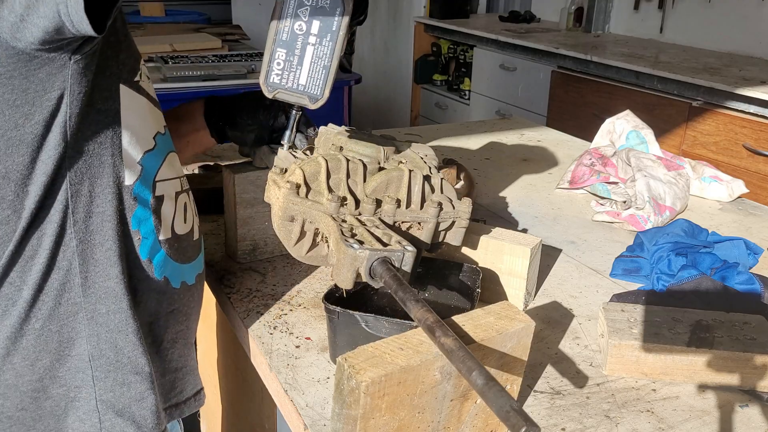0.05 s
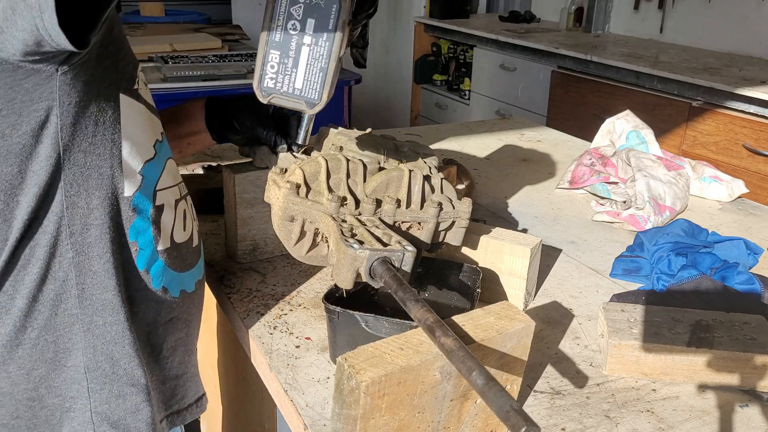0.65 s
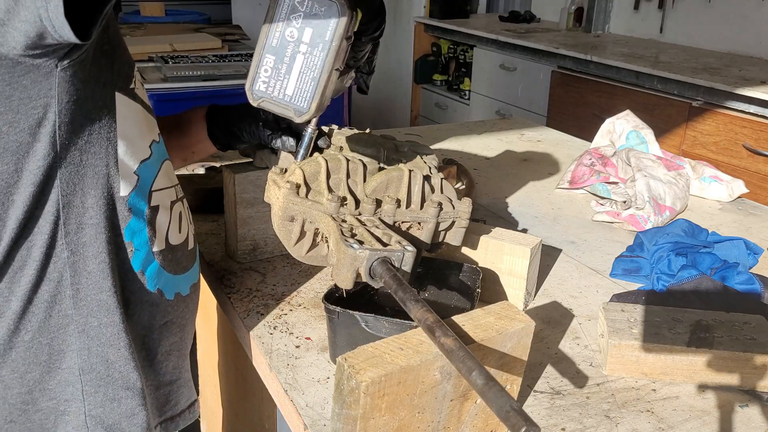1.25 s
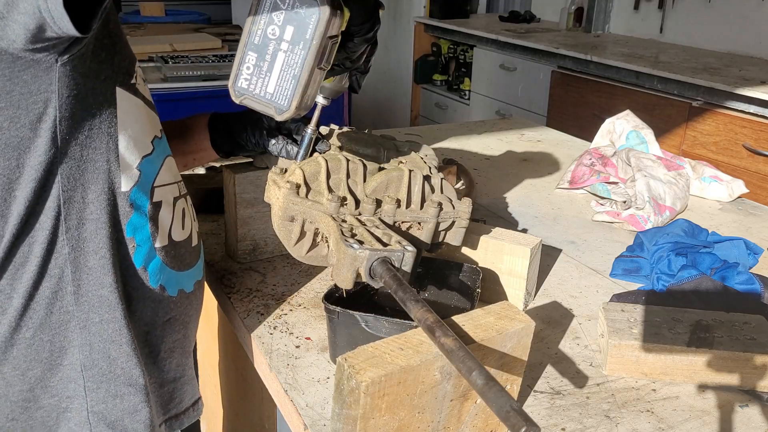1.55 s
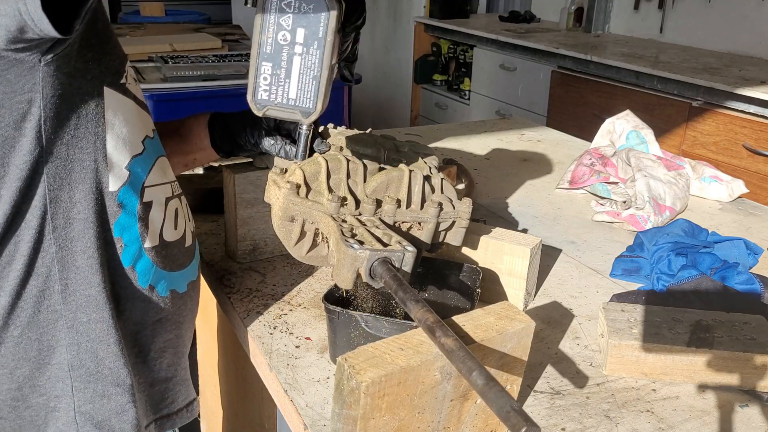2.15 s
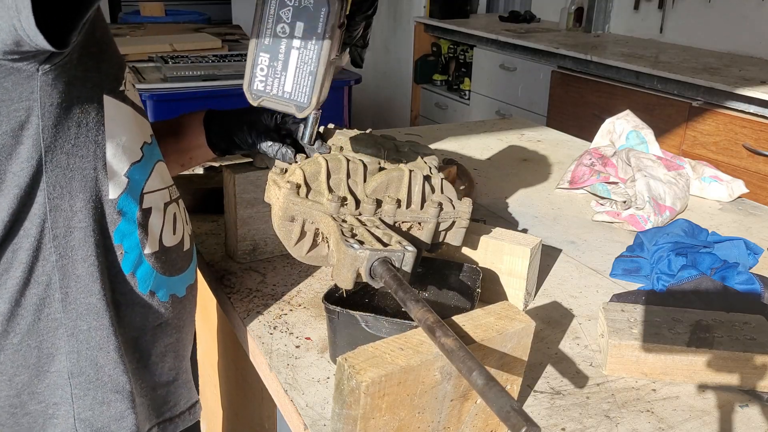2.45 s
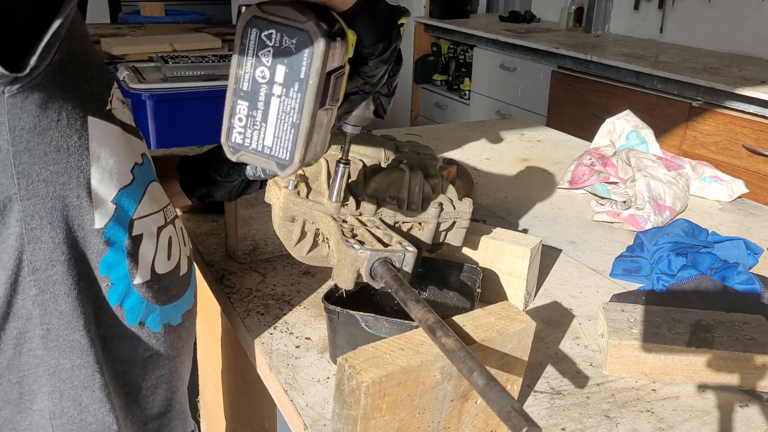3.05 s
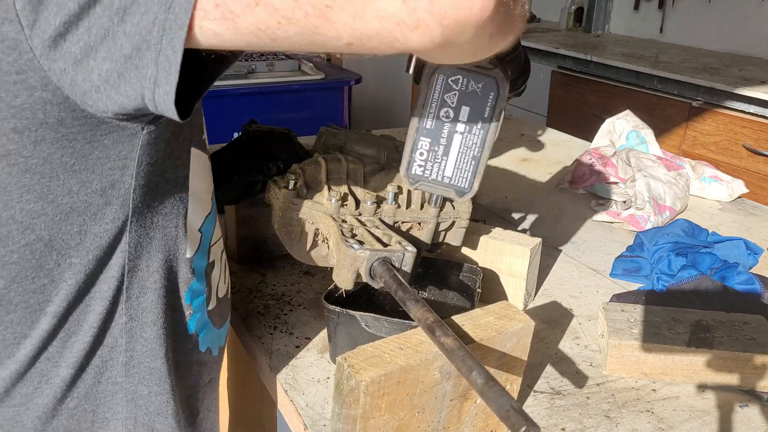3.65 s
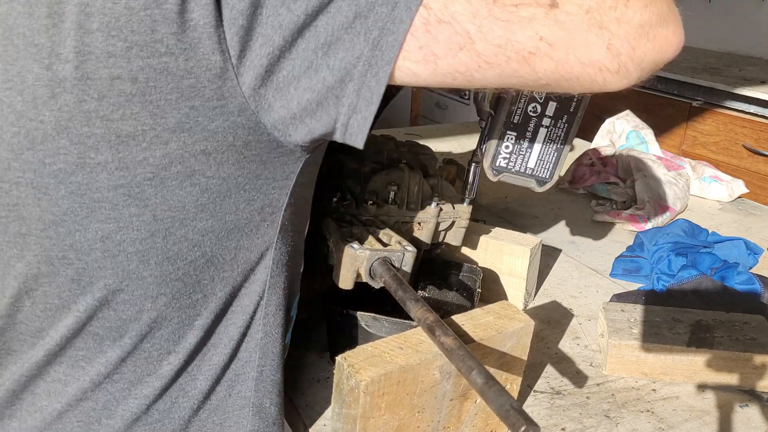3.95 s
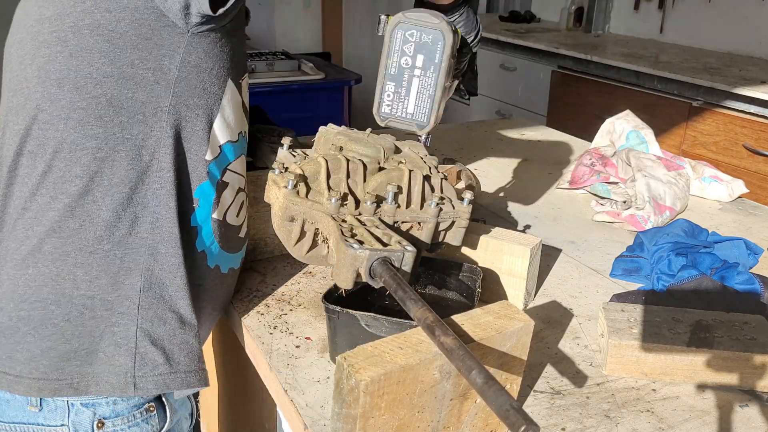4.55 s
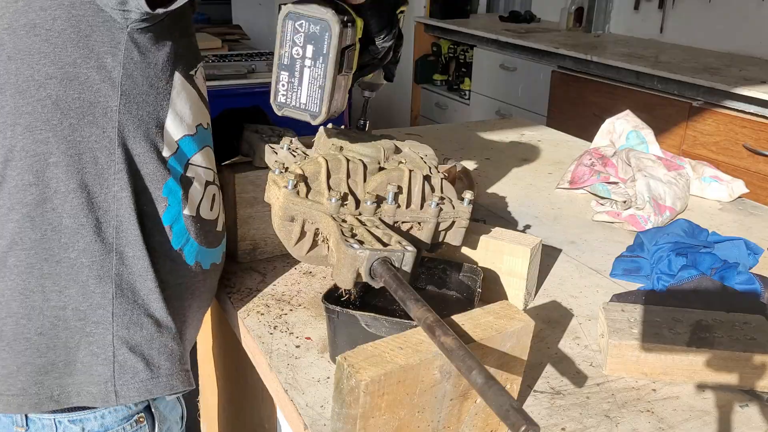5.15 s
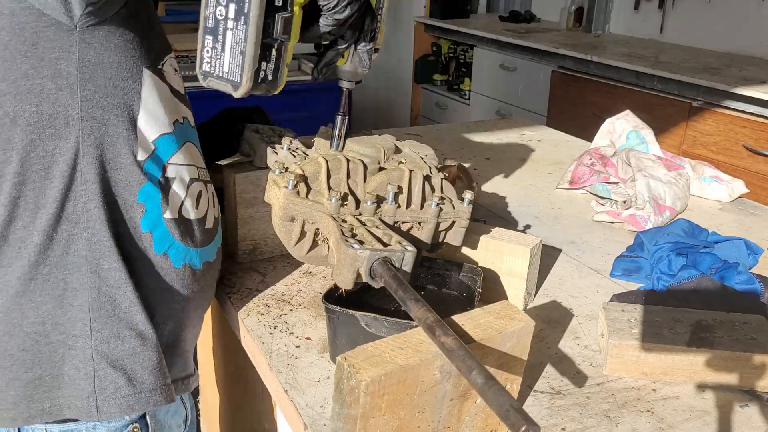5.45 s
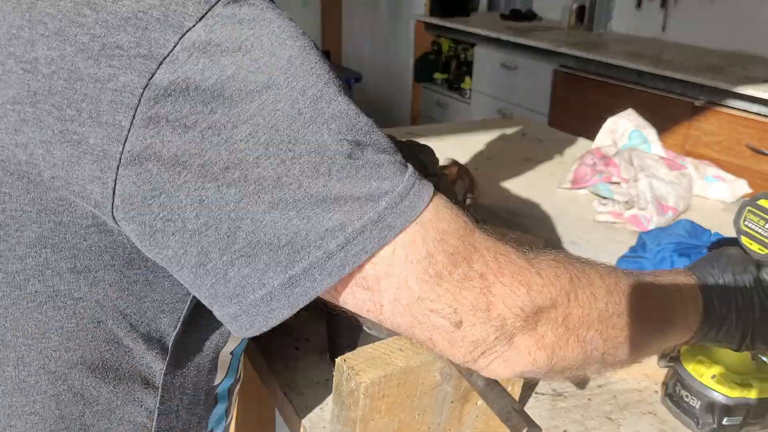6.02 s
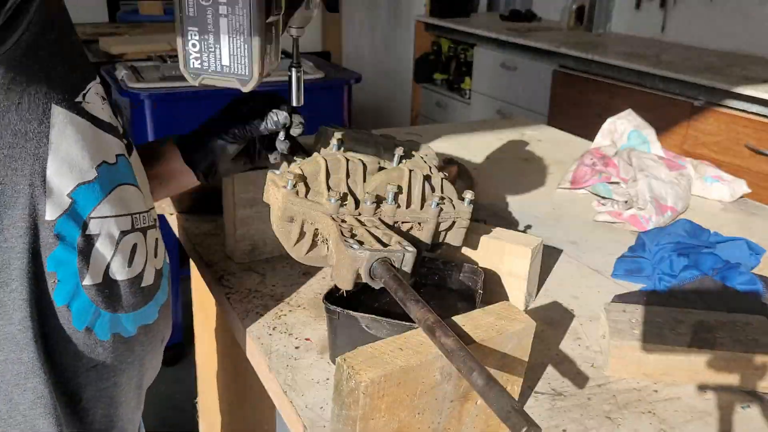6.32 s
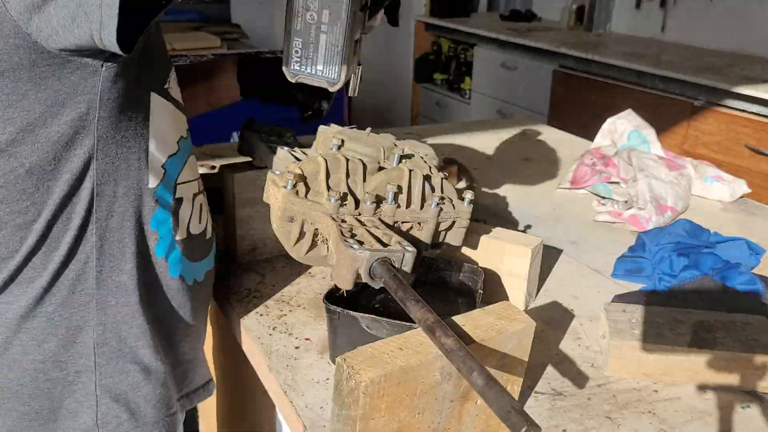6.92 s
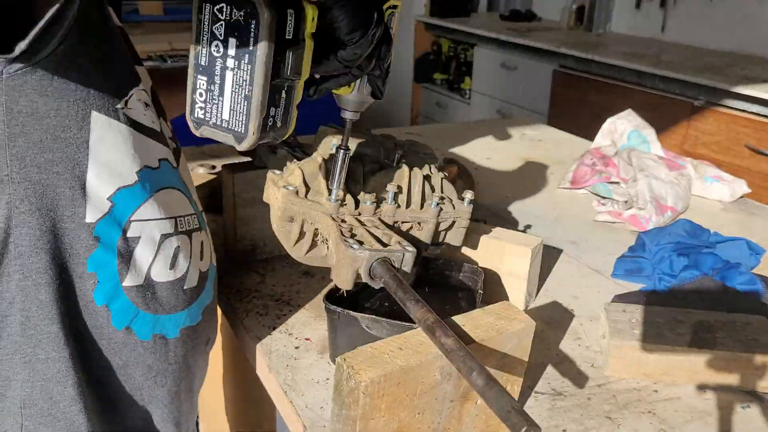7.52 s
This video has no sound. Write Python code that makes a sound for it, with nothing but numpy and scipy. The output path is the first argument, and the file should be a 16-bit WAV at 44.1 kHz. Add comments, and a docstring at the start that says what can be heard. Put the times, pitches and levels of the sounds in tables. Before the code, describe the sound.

A steel socket knocks sharply on a metal casing right at the start, close to the microphone in a quiet workshop. From about 0.8 seconds it taps and scrapes softly onto a bolt. Between 1.5 and 2.4 seconds a cordless impact driver hammers in two loud rattling bursts and a weaker blip, with a low boom from the wooden bench and a short room echo.

At 2.7 seconds everything turns sped up, higher and drier. Tiny rasps and motor whirs come several times a second, mixed with sharp metal clicks and clacks, loudest from about 3.7 to 5.5 seconds. Cloth rustles faintly near 4 and 6 seconds, and the driver's plastic body gives a hollow clunk just after 6. Quick high motor chirps and more clicks follow, ending in two short, fluttering whines between 7.5 and 7.8 seconds.

```python
"""Impact driver at a workshop bench

Close to the microphone, almost in mono, a cordless impact driver backs bolts out of a cast metal casing.
The socket knocks onto a bolt, the hammer rattles it loose, the wooden bench booms and the room answers.
Then the job rushes on in fast motion: bolt after bolt in short rasps, whirs and clicks,
with the bench ringing about eight times higher and shorter."""
import sys
import numpy as np
from scipy import signal
from scipy.fft import rfft, irfft, next_fast_len
from scipy.io import wavfile
from scipy.ndimage import uniform_filter1d

SR = 44100
rng = np.random.default_rng(int(sys.argv[2]) if len(sys.argv) > 2 else 0)


def generate_wav(sig):
    """Save sig (samples, or channels by samples) to the path in sys.argv[1] as 16-bit PCM at SR."""
    pcm = np.round(np.clip(np.atleast_2d(sig).T, -1, 1) * 32767).astype(np.int16)
    wavfile.write(sys.argv[1], SR, pcm)


N = 343098
T = np.arange(N) / SR
FAST_FROM_S, FAST_PACE = 2.72, 8.0

# trigger pulls on the first bolt: (pressed [s], let go [s], hammering [dB], dying away [dB/s])
TRIGGER_PULLS = [(1.46, 1.606, -14, 429), (1.826, 2.043, -8.5, 223.5), (2.223, 2.319, -26.5, 899)]
# hard blows that stand out, mostly as the hammer slows: (time [s], peak [dB])
HARD_BLOWS = [(1.519, -2), (1.543, -11), (1.583, -4.5), (1.596, -4.5), (2.067, -3), (2.081, -4.5),
              (2.102, -1), (2.113, -17), (2.125, -2), (2.147, -5.5), (2.169, -15.5), (2.245, -16),
              (2.336, -18.5)]
# how tightly the bolt passes blows on to the casing: (time [s], share [dB])
BOLT_GRIP = [(1.54, -5), (1.63, 4.5), (1.86, -5), (1.95, -3.5), (2.06, -9.5), (2.14, -22.5), (2.3, -10.5)]
# ring of the steel socket and anvil: (frequency [Hz], width [Hz], level [dB])
SOCKET_MODES = [(3500, 510, 0), (5086, 170, 5), (5860, 770, -8)]
# hammered steel and the cast casing, heard close up: (frequency [Hz], level [dB])
STEEL_SPECTRUM = [(1290, -45.5), (2200, -14.5), (2890, -15), (3420, -9), (4130, -3), (5000, 3.5), (5480, 0),
                  (8440, -0.5), (9890, 2), (13100, -9), (15200, -21), (16000, -18.5)]
CASING_SPECTRUM = [(65, -38), (110, -16.5), (177, -5), (234, -15), (317, -5), (377, -5), (424, 0),
                   (538, -0.5), (951, -3.5), (1840, -4.5), (2600, -31), (3380, -43), (5720, -120)]
def first_bolt(spin_up_db=39.5, spin_up_s=0.02, slam_t60=0.053):
    """Hammer blows ring the socket; while the bolt is tight they also shake the casing and bench."""
    def steel(x):
        return undb(-2) * colour(x, STEEL_SPECTRUM) + undb(-3) * resonate(x, SOCKET_MODES)

    blows = chatter(rate=185, jitter=.25, scatter_db=2.2, t60=.028)
    force, slams = np.zeros((2, N))
    for press, let_go, db, fall in TRIGGER_PULLS:
        shortfall_db = spin_up_db * np.exp(-np.maximum(T - press, 0) / spin_up_s)
        force += (T > press) * undb(db - shortfall_db - fall * np.maximum(T - let_go, 0))
    grip = force * undb(np.interp(T, *np.transpose(BOLT_GRIP)))
    for s, db in HARD_BLOWS:
        add(slams, s, undb(db - 7) * fade(T[:SR // 2], slam_t60))
    crack = noise()
    hard_blows = slams * (steel(crack) + undb(-6) * colour(crack, CASING_SPECTRUM))
    return force * steel(blows) + grip * colour(blows, CASING_SPECTRUM) + hard_blows + rocking(grip)


# tight bolts in fast motion:
# (pressed [s], hammering lasts [s], standstill [s], hammering [dB], casing share [dB], motor [dB])
TIGHT_BOLTS = [(2.818, .011, 2.849, -15.5, -16, -18), (2.974, 0.01, 3.009, -15.5, -15, -18.5),
               (3.111, 0.013, 3.141, -17, -11, -18), (3.322, 0.018, 3.361, -16, -13.5, -22),
               (3.478, 0.014, 3.51, -14.5, -9.5, -27.5), (3.514, 0.015, 3.569, -15.5, -12, -20.5),
               (3.687, 0.014, 3.731, -14.5, -11, -25), (3.836, 0.013, 3.88, -16.5, -9.5, -22.5),
               (4.305, 0.016, 4.346, -16, -12.5, -30), (4.638, .015, 4.676, -16, -14.5, -20.5),
               (4.81, 0.02, 4.845, -16, -15, -33), (5.023, .016, 5.062, -15.5, -10.5, -24),
               (5.17, 0.016, 5.218, -15.5, -10.5, -24.5), (5.332, 0.024, 5.377, -19.5, -9, -20.5),
               (5.524, 0.017, 5.571, -16.5, -22, -23), (5.694, 0.0086, 5.743, -16, -22, -20)]
# hammer and casing in fast motion: (frequency [Hz], level [dB])
RASP_SPECTRUM = [(88, -57), (150, -37), (303, -57), (675, -11), (1140, -12.5), (1690, -6.5), (2310, -11),
                 (4160, -3), (4950, 4.5), (6640, 1.5), (10800, -5.5), (12200, -2.5), (15100, -6.5),
                 (16000, -3)]
def fast_bolts(take_up_s=0.0042, rise_s=0.0028, release_s=0.0052, lag_s=0.0055):
    """Each bolt is one short rasp of blows that rings the casing; the bench boom builds behind it."""
    force, grip, shake = np.zeros((3, N))
    t = T[:SR // 10] - take_up_s  # the motor turns before the hammer catches
    for press, length, _, db, casing_db, _ in TIGHT_BOLTS:
        gate = np.interp(t, [-rise_s / 2, rise_s / 2, length, length + release_s], [0, 1, 1, 0])
        swell = np.interp(t, [-rise_s, lag_s, length + lag_s, length + 3 * lag_s], [0, 1, 1, 0])
        add(force, press, undb(db) * gate)
        add(grip, press, undb(db + casing_db) * gate)
        add(shake, press, undb(db) * swell)
    blows = chatter(rate=600, jitter=.25, scatter_db=6, t60=0.051)
    steel = force * colour(blows, RASP_SPECTRUM, lo_hz=2700)
    casing = grip * colour(blows, RASP_SPECTRUM, hi_hz=2500)
    return steel + casing + undb(-13) * shake * bench_boom(FAST_PACE, bench_pitch(T))


# loose bolts spun out in fast motion: (pressed [s], standstill [s], motor [dB])
LOOSE_BOLTS = [(2.856, 2.872, -20), (3.013, 3.033, -18), (3.171, 3.192, -20.5), (4.35, 4.372, -21),
               (4.679, 4.701, -20), (5.059, 5.086, -18.5), (6.266, 6.295, -20), (6.297, 6.345, -17),
               (6.49, 6.543, -16), (6.671, 6.722, -15), (6.831, 6.864, -24), (6.868, 6.915, -16),
               (7.011, 7.065, -16.5), (7.161, 7.199, -17.5), (7.393, 7.44, -16)]
def motor_runs():
    """Every full-trigger run of the motor: (pressed [s], standstill [s], level [dB])."""
    return [(press, stop, db) for press, _, stop, _, _, db in TIGHT_BOLTS] + LOOSE_BOLTS


# whir of the gearbox: (frequency [Hz], level [dB])
GEAR_SPECTRUM = [(350, -36.5), (600, -7.5), (1220, -19.5), (2460, -15), (4540, -7.5), (5060, -5.5),
                 (10100, 0), (15400, -3.5)]
def motor(top_hz=4650, run_up_s=0.0066, brake_hz_per_s=235000):
    """The gears whir up, sing a tone near full speed, then the brake drags a whine down."""
    gears = colour(chatter(rate=550, jitter=.3, scatter_db=2.2, t60=.018), GEAR_SPECTRUM)
    out = np.zeros(N)
    for start, stop, db in motor_runs():
        span = slice(int(start * SR), int(stop * SR))
        t = T[span]
        driven = top_hz * (1 - np.exp(-(t - t[0]) / run_up_s))
        braked = brake_hz_per_s * np.maximum(stop - t, 0)
        hz = np.minimum(driven, braked)
        speed = hz / top_hz
        gear_tone = undb(-5) * speed ** 8 * np.sin(rotor_phase(hz, waver=.025))
        braking = np.clip((driven - braked) / 400, 0, 1)
        whine = braking * np.clip(6 * speed - 2.2, 0, 1) * np.sin(rotor_phase(4 * hz, waver=.005))
        add(out, start, undb(db) * (speed ** 0.79 * gears[span] + gear_tone + whine))
    return out


# the last bolts on a half-pressed trigger, one list per run: (time [s], whine [Hz], level [dB])
HALF_TRIGGER_RUNS = [
    [(7.502, 5000, -30), (7.525, 7300, -20.5), (7.555, 7400, -11), (7.575, 7030, -29.5), (7.592, 5580, -23)],
    [(7.692, 4720, -32.5), (7.708, 5680, -21), (7.757, 6600, -19.5), (7.78, 7120, -35)],
]
def winding_out():
    """At part speed the motor holds a rough, fluttering whine and its octave over the gear noise."""
    out = np.zeros(N)
    for run in HALF_TRIGGER_RUNS:
        s, hz, db = np.transpose(run)
        phase = rotor_phase(np.interp(T, s, hz), waver=.02)
        flutter = np.abs(unit(uniform_filter1d(noise(), size=240)))
        whine = flutter * (undb(-3) * np.sin(phase) + undb(-5) * np.sin(2 * phase))
        gears = undb(-3) * colour(noise(), GEAR_SPECTRUM)
        out += contour(np.transpose([s, db])) * (whine + gears)
    return butterworth(out, 450, "high", order=4)


# socket and tool on the casing, at each pace: (time [s], peak [dB], thud relative to peak [dB])
SLOW_CONTACTS = [(0.001, -9.5, -50), (0.007, -15, -36), (0.032, -14, -27.5), (.159, -40, -6.5),
                 (.303, -51, 0), (0.762, -28.5, -17), (.78, -36, -8), (.83, -44, -5), (.911, -41.5, -20),
                 (.931, -39.5, -3), (1.085, -28, -48), (1.097, -26, -21.5), (1.235, -31, -7.5)]
FAST_CONTACTS = [(2.804, -22.5, 0.5), (3.075, -30, -16), (3.273, -23, -34), (3.301, -14.5, -9.5),
                 (3.654, -0.5, -24), (3.786, -14.5, -16), (3.802, -7, -17), (4.005, -17, -14),
                 (4.125, 8, -19), (4.251, -8.5, -10.5), (4.267, 5.5, -20), (4.526, -20, -8), (4.54, -3, -8),
                 (4.593, 1, -5.5), (4.756, -31, -6), (4.836, 2, -41), (4.903, -29.5, -14), (4.944, -9, -11),
                 (4.978, -4, -8.5), (4.99, 4, -16.5), (5.144, -16.5, -9), (5.243, -22, -37),
                 (5.282, -15, -21), (5.313, 2, -29), (5.489, 0.5, -14), (5.622, -26.5, 0.5),
                 (5.661, -5, -12), (5.964, -41.5, 19.5), (6.202, -19.5, -6), (6.226, -13, -3),
                 (6.243, -13.5, -1), (6.421, -25, -55), (6.457, -16, -12.5), (6.607, -18, -55),
                 (6.617, -18, -32), (6.782, -20, -22), (6.8, -14.5, -52), (6.843, -5.5, -48),
                 (6.997, -9, -17), (7.14, -5, -17), (7.287, -10.5, -53), (7.346, -19, -10),
                 (7.379, -6.5, -7.5), (7.504, -2, -15), (7.662, -15, -11)]
# crack of those contacts, at each pace: (frequency [Hz], level [dB])
KNOCK_SPECTRUM = [(120, -46.5), (200, -14), (742, 0.5), (1010, -3.5), (1560, -2.5), (2250, -17), (3360, -8),
                  (4100, -10), (5110, -10), (7760, -4.5), (8500, -3.5), (11200, -5), (15500, -32)]
FAST_KNOCK_SPECTRUM = [(210, -48), (350, -36), (459, -8.5), (613, 4), (1220, -3), (1550, 4.5), (2310, 0),
                       (3030, 0), (3980, -1.5), (4750, 7), (7430, -0.5), (14100, -9.5), (16000, -5)]
def knocks(rows, spectrum, pace, rise_s, t60, body_db, treble_db, treble_slope, boom_db):
    """Each contact is a crack of dense metal modes and a bench thud; more thud means a duller crack."""
    t = np.arange(int(.5 * SR / np.sqrt(pace))) / SR
    body, treble, thud = np.zeros((3, N))
    crack = (1 - np.exp(-t / rise_s)) * fade(t, t60)
    chance = rng.standard_normal((len(rows), len(BENCH_MODES), 2))
    for (s, db, thud_db), draws in zip(rows, chance):
        add(body, s, undb(db) * crack)
        add(treble, s, undb(treble_slope * db - .15 * thud_db) * crack * fade(t, 0.044))
        pitch = pace * (bench_pitch(s) if s > FAST_FROM_S else 1)
        ring = np.zeros(len(t))
        for (hz, mode_db, ring_s), (detune, offset) in zip(BENCH_MODES, draws):
            phase = 2 * np.pi * hz * pitch * (1 + 0.06 * detune) * t + np.pi * offset
            ring += undb(mode_db) * fade(t * pace, ring_s) * np.sin(phase)
        add(thud, s, undb(db + thud_db) * ring * (1 - np.exp(-t * pace / 0.045)))
    return (undb(body_db) * body * colour(noise(), spectrum, hi_hz=6500)
            + undb(treble_db) * treble * colour(noise(), spectrum, lo_hz=6850) + undb(boom_db) * thud)


# the driver's plastic shell: (frequency [Hz], undamped width [Hz], level [dB])
SHELL_MODES = [(773, 28, -3.5), (1462, 130, -5), (3060, 29, 6), (4020, 40, -5.5), (4160, 38, -13.5)]
def driver_bump(at_s=6.061, level_db=-5.5, damping_hz=420):
    """The driver clunks on the bench: the gripping hand damps its shell, the lowest mode rings on."""
    t = np.maximum(T - at_s, 0)
    shell = resonate(noise(), [(hz, width + damping_hz, db) for hz, width, db in SHELL_MODES])
    hollow = undb(-8) * fade(t, t60=0.057) * np.sin(2 * np.pi * SHELL_MODES[0][0] * t)
    clunk = undb(level_db) * (T > at_s) * (fade(t, t60=0.037) * shell + hollow)
    return butterworth(clunk, 550, "high", order=4)


# bench and casing rocking on their blocks, before pace scales them: (frequency [Hz], level [dB], t60 [s])
BENCH_MODES = [(64.7, -4.5, 0.32), (77.5, 5, 0.31), (97.6, 2.5, 0.19), (113, -3, 0.082)]
def bench_boom(pace, pitch_ratio=1):
    """The bench's low modes, kept ringing by steady shaking and bent by a pitch ratio."""
    ring = resonate(noise(), [(hz * pace, 5.1 * pace / t60, db) for hz, db, t60 in BENCH_MODES])
    position = np.cumsum(pitch_ratio * np.ones(N)) % N
    return np.interp(position, np.arange(N), ring)


# tuning of the bench in fast motion: (time [s], pitch [ratio])
BENCH_TUNING = [(3.7, 1.06), (4.3, .94), (5.0, .97), (5.6, 1.107)]
def bench_pitch(s):
    """The bench answers lower while the middle of the casing is pressed."""
    return np.interp(s, *np.transpose(BENCH_TUNING))


# pushes on the driver that rock the bench: (time [s], level [dB])
HAND_PUSHES = [(0.06, -49), (.87, -51), (1.29, -33)]
def rocking(grip, lag_s=.08, push_db_per_s=115):
    """The bench's low boom lags behind the hammering and swells with each push on the driver."""
    step = 1 / (lag_s * SR)
    shaken = undb(-9.5) * signal.lfilter([step], [1, step - 1], grip)
    pushed = sum(undb(db - push_db_per_s * np.abs(T - s)) for s, db in HAND_PUSHES)
    return (shaken + pushed) * butterworth(bench_boom(pace=0.97), 8000, "low")


# trigger touches that nudge the socket into line: (time [s], level [dB])
TRIGGER_TOUCHES = [(3.087, -38.5), (6.473, -39.5), (6.651, -34.5), (6.808, -33.5), (7.003, -36.5),
                   (7.491, -35.5), (7.687, -29)]
def nudges(length_s=.014):
    """The motor barely turns over: its low whine sinks at once and the socket rattles."""
    out = np.zeros(N)
    progress = np.linspace(0, 1, int(length_s * SR))
    envelope = unit(np.sqrt(progress) * (1 - progress))
    rattle = undb(-2) * colour(noise(), FAST_KNOCK_SPECTRUM)
    for (s, db), pitch in zip(TRIGGER_TOUCHES, rng.uniform(.7, 1.15, len(TRIGGER_TOUCHES))):
        hz = pitch * (2200 - 1200 * progress)
        whine = np.sin(rotor_phase(hz, waver=.16))
        add(out, s, undb(db) * envelope * (whine + rattle[int(s * SR):][:len(whine)]))
    return out


# the socket scraping on the first bolt head, and the motor creeping: (time [s], level [dB])
SCRAPE_LEVELS = [(.74, -68.5), (.78, -44.5), (.87, -68), (.93, -53), (1.0, -66), (1.12, -55.5), (1.3, -55)]
CREEP_LEVELS = [(1.02, -70), (1.3, -58), (1.47, -56)]
# resonances of the creeping motor: (frequency [Hz], width [Hz], level [dB])
MOTOR_MODES = [(868, 160, 0), (2330, 220, -12), (4100, 900, -12.5)]
def seating():
    """Loose ticks of the socket on the bolt head while the motor creeps round."""
    ticks = colour(chatter(rate=90, jitter=0.6, scatter_db=4, t60=0.03), KNOCK_SPECTRUM, hi_hz=6460)
    creep = resonate(noise(), MOTOR_MODES)
    return undb(-2) * contour(SCRAPE_LEVELS) * ticks + undb(1) * contour(CREEP_LEVELS) * creep


def fumbling(lead_s=.06, level_db=-45):
    """Just before each run of the motor the socket ticks lightly as it hunts for the bolt head."""
    starts = [run[0] for run in motor_runs()] + [run[0][0] for run in HALF_TRIGGER_RUNS]
    hunting = np.any([(T > start - lead_s) & (T < start - .008) for start in starts], axis=0)
    ticks = chatter(rate=130, jitter=0.66, scatter_db=11.5, t60=0.022)
    return undb(level_db) * hunting * colour(ticks, FAST_KNOCK_SPECTRUM)


# sleeves passing the microphone in fast motion, one list per sweep: (time [s], level [dB])
SLEEVE_SWEEPS = [
    [(3.96, -51.5), (4.07, -50), (4.2, -49), (4.26, -65)],
    [(5.81, -69.5), (5.84, -45.5), (5.89, -58), (5.96, -45), (6.03, -53), (6.2, -44)],
]
def sleeves():
    """Cloth sweeps past in a dense, grainy rustle."""
    grains = chatter(rate=1400, jitter=0.37, scatter_db=10, t60=0.025)
    cloth_spectrum = [(300, -4.5), (700, 5.0), (2000, -7.0), (10000, -14.0), (16000, -17.5)]
    return sum(contour(sweep) for sweep in SLEEVE_SWEEPS) * colour(grains, cloth_spectrum, lo_hz=400)


# workshop air all around the microphone, at each pace: (frequency [Hz], level [dB])
AIR_SPECTRUM = [(18, -41), (30, -14.5), (98, -7.5), (235, -24.5), (281, -16.5), (393, -26.5), (2090, -35.5),
                (5990, -40.5), (14000, -59)]
FAST_AIR_SPECTRUM = [(120, -66), (200, -38), (505, -4), (856, -7.5), (990, -7.5), (1590, -16), (9090, -24),
                     (15400, -19)]
def room_tone(hum_hz=1000):
    """Quiet room air, and a hum that fast motion lifts to a faint tone."""
    slow_air = undb(-66) * colour(noise(), AIR_SPECTRUM)
    fast_air = undb(-62) * colour(noise(), FAST_AIR_SPECTRUM, hi_hz=9600)
    hum = undb(-62) * resonate(noise(), [(hum_hz, 10, 0)])
    return np.where(T > FAST_FROM_S, fast_air + hum, slow_air)


def room(x, t60, treble_t60, crossover_hz, build_s, wet_db=-15.5):
    """Direct sound from the bench, then a diffuse tail whose treble dies sooner."""
    t = T[:SR]
    white = rng.standard_normal(SR)
    low = butterworth(white, crossover_hz, "low") * fade(t, t60)
    high = butterworth(white, crossover_hz, "high") * fade(t, treble_t60)
    tail = (low + high) * (1 - np.exp(-t / build_s))
    return x + undb(wet_db) * signal.fftconvolve(x, tail / np.linalg.norm(tail))[:N]


def chatter(rate, jitter, scatter_db, t60):
    """Uneven train of about `rate` blows a second, each a short spray of contacts; rms 1."""
    timing, strength = rng.standard_normal((8000, 2)).T
    at = (np.cumsum(np.exp(jitter * timing)) * SR / rate).astype(int)
    blows = np.zeros(N)
    blows[at[at < N]] = undb(scatter_db * np.clip(strength[at < N], -2, 2))
    decays = signal.lfilter([1], [1, -fade(1 / SR, t60)], blows)
    return unit(decays * noise())


def rotor_phase(hz, waver):
    """Phase of a rotor whose speed wavers by the given share."""
    wobble = unit(uniform_filter1d(rng.standard_normal(len(hz)), size=24))
    return 2 * np.pi * np.cumsum(hz * (1 + waver * wobble)) / SR


def resonate(x, modes):
    """Ring (frequency [Hz], width [Hz], level [dB]) resonances; rms 1."""
    def response(f):
        return sum((-1) ** k * undb(db) / (1 + 1j * (f * f - hz * hz) / (f * width))
                   for k, (hz, width, db) in enumerate(modes))
    return unit(filtered(x, response))


def colour(x, spectrum, lo_hz=1, hi_hz=SR):
    """Shape by a (frequency [Hz], level [dB]) spectrum between two soft edges; rms 1."""
    def response(f):
        hz, db = np.transpose(spectrum)
        edges = np.sqrt((1 + (lo_hz / f) ** 8) * (1 + (f / hi_hz) ** 8))
        return undb(np.interp(np.log(f), np.log(hz), db)) / edges
    return unit(filtered(x, response))


def filtered(x, response):
    """Apply a frequency response given as a function of Hz."""
    size = next_fast_len(N + 8192)
    hz = np.arange(size // 2 + 1) * SR / size + 1e-3
    return irfft(rfft(x, size) * response(hz), size)[:N]


def butterworth(x, hz, kind, order=2):
    """Low-pass or high-pass filter."""
    return signal.sosfilt(signal.butter(order, hz, kind, fs=SR, output="sos"), x)


def contour(rows):
    """Gain along (time [s], level [dB]) rows, silent outside them."""
    s, db = np.transpose(rows)
    return undb(np.interp(T, s, db)) * (T >= s[0]) * (T <= s[-1])


def fade(t, t60):
    """Exponential decay, 60 dB down after t60."""
    return np.exp(-np.log(1000) * t / max(t60, 1e-3))


def add(track, s, sound):
    """Mix a sound in at time s."""
    i = min(max(int(s * SR), 0), N)
    track[i:i + len(sound)] += sound[:N - i]


def noise():
    """White noise."""
    return rng.standard_normal(N)


def undb(db):
    """Decibels to gain."""
    return 10 ** (np.asarray(db) / 20)


def unit(x):
    """Scale to rms 1."""
    return x / np.sqrt(np.mean(x ** 2) + 1e-20)


def scene(side_treble_db=-25):
    """Both paces from one spot beside the bench; only the treble differs a little left to right."""
    slow = first_bolt() + seating()
    slow += knocks(SLOW_CONTACTS, KNOCK_SPECTRUM, pace=0.88, rise_s=.0003, t60=0.058,
                   body_db=-6.5, treble_db=-20.5, treble_slope=1.0, boom_db=-8.5)
    fast = fast_bolts() + motor() + winding_out() + driver_bump() + fumbling() + nudges()
    fast += knocks(FAST_CONTACTS, FAST_KNOCK_SPECTRUM, pace=FAST_PACE, rise_s=0.0026, t60=0.029,
                   body_db=-9.0, treble_db=-13.5, treble_slope=0.51, boom_db=-4.0)
    mid = (room(slow, t60=0.36, treble_t60=0.23, crossover_hz=9200, build_s=0.0062)
           + room(fast, t60=0.071, treble_t60=0.052, crossover_hz=5400, build_s=0.0017)
           + sleeves() + room_tone())
    side = undb(side_treble_db) * np.diff(np.roll(mid, 9), prepend=0)
    return np.array([mid + side, mid - side])


def record(dry, ceiling=0.78, top_hz=15800):
    """The recorder rounds off the loudest peaks and cuts the top."""
    rounded = dry / (1 + (dry / ceiling) ** 4) ** (1 / 4)
    return signal.sosfilt(signal.ellip(10, .2, 80, top_hz, fs=SR, output="sos"), rounded)


dry = scene()
out = record(dry)
generate_wav(out)
```